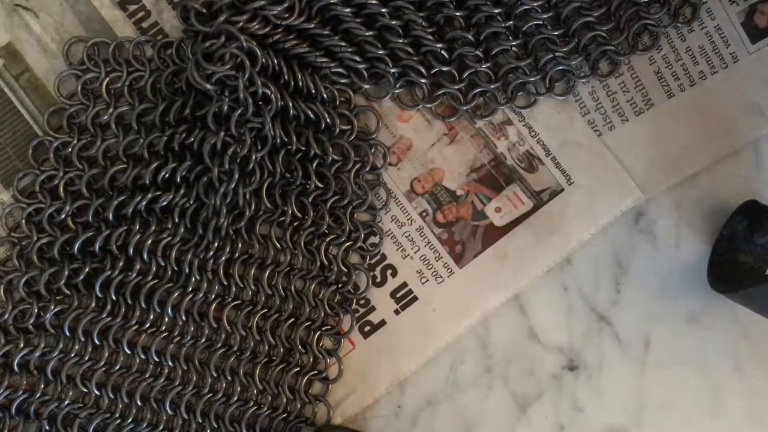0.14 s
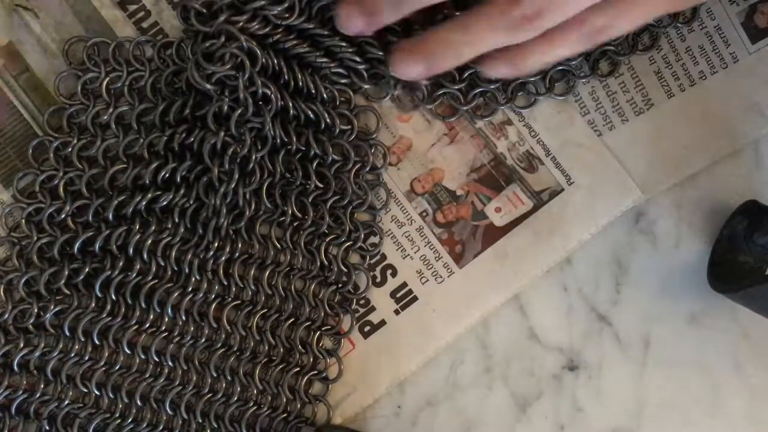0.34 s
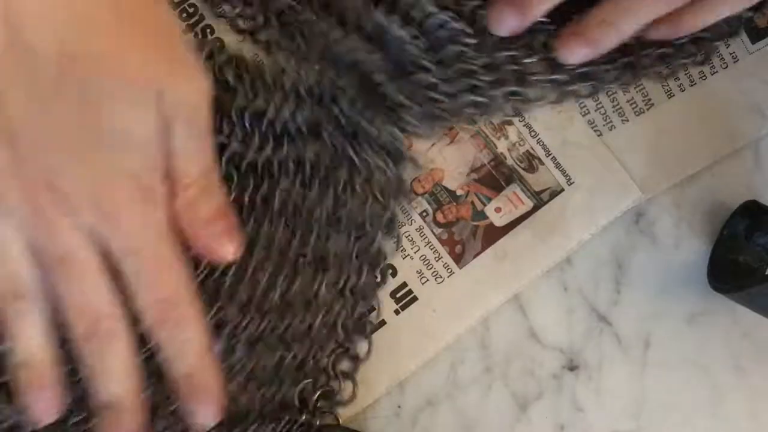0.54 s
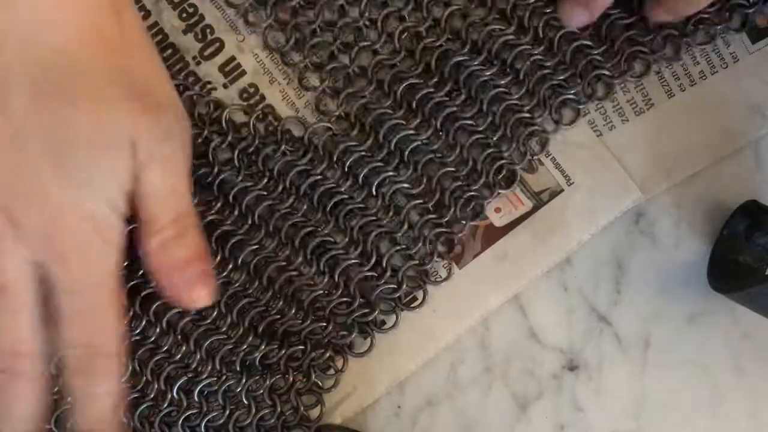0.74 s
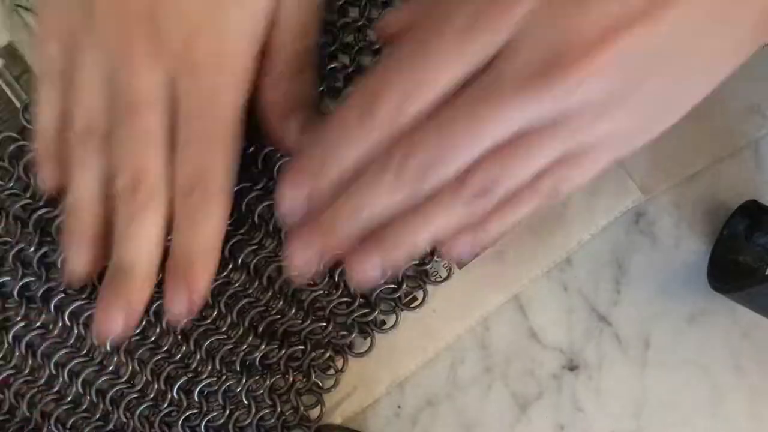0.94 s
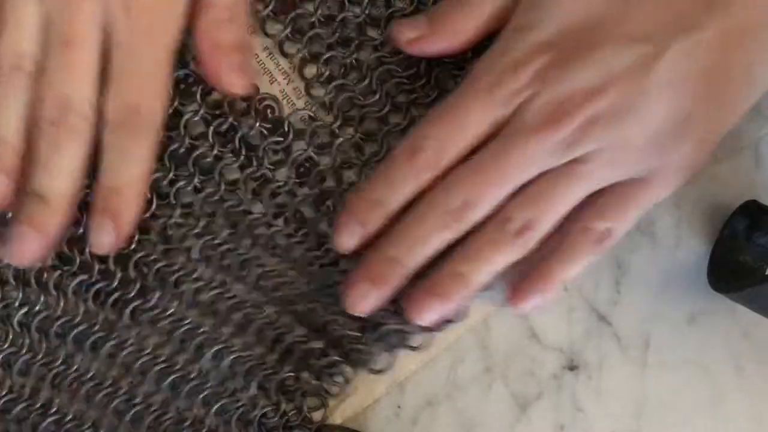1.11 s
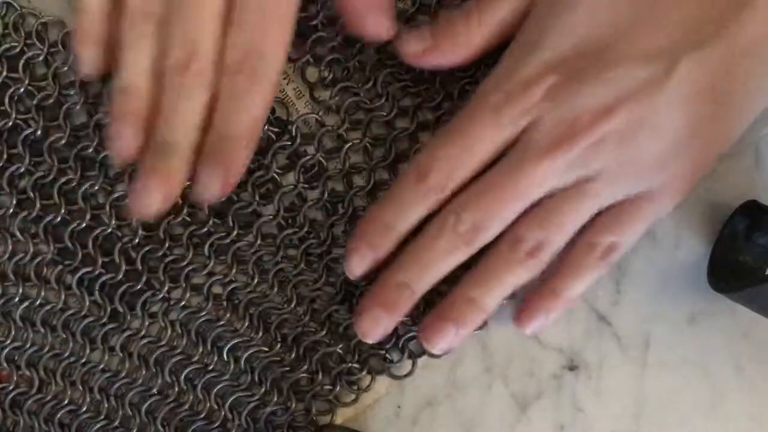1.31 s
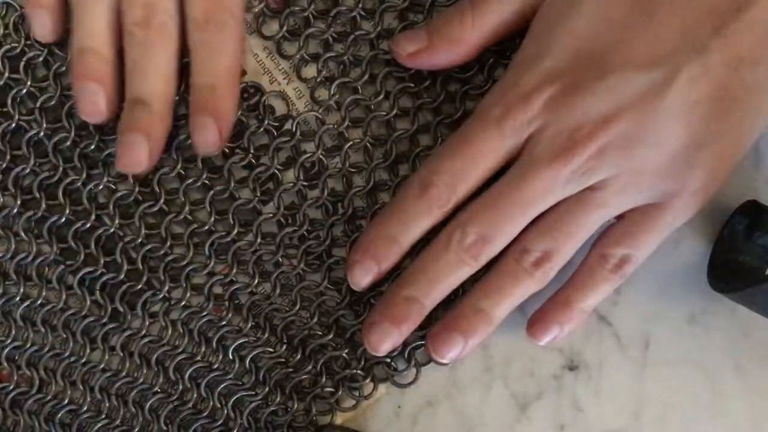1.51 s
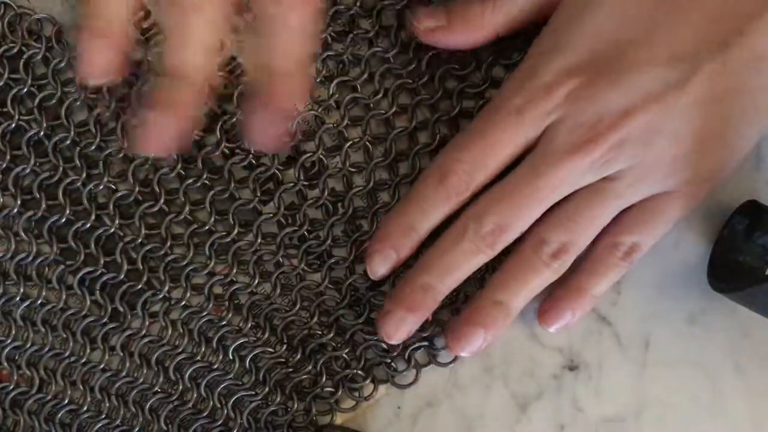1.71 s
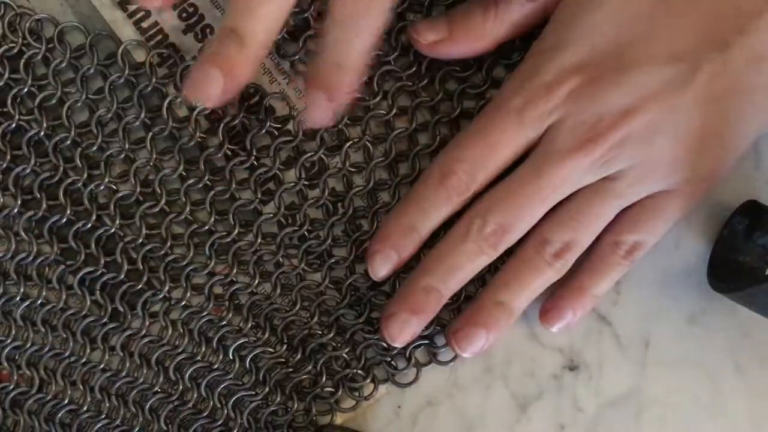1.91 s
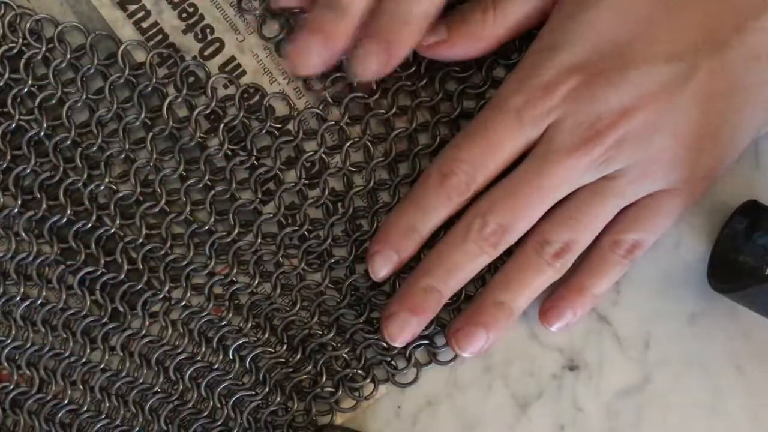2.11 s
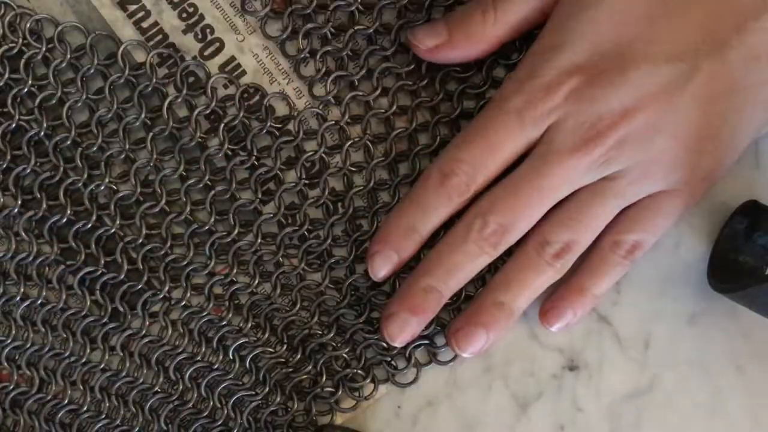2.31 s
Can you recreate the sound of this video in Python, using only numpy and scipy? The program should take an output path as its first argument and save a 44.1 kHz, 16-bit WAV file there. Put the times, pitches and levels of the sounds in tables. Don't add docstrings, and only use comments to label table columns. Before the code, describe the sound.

Close up indoors, steel mesh drops on a paper-covered stone table with a bright crack and dull thud, then hands sweep it flat in jingly hisses, fading to small ticks and a last hard click.

```python
import sys
import numpy as np
from scipy import signal
from scipy.fft import rfft, irfft, next_fast_len
from scipy.io import wavfile
from scipy.ndimage import uniform_filter1d, map_coordinates

SR = 44100
rng = np.random.default_rng(int(sys.argv[2]) if len(sys.argv) > 2 else 0)


def level_to_linear(level):
    exponent = np.asarray(level, float) / 20
    return 10 ** exponent


def unload_wav(signal):
    wavfile.write(
        sys.argv[1],
        SR,
        np.round(np.clip(np.atleast_2d(signal).T, -1, 1) * 32767).astype(np.int16),
    )


N = 103635


def unit(x):
    return x / np.sqrt(np.mean(x ** 2) + 1e-20)


def along(points, hz):
    f, v = np.transpose(points)
    return np.interp(np.log(hz + 1), np.log(f + 1), v)


def filtered(x, response):
    m = next_fast_len(len(x) + 8192)
    return irfft(rfft(x, m) * response(np.fft.rfftfreq(m, 1 / SR)), m)[:len(x)]


def shaped_noise(length, points):
    return unit(filtered(rng.standard_normal(length), lambda f: level_to_linear(along(points, f))))


def bands(peaks, f):
    total = 0
    for k, (c, w, db) in enumerate(peaks):
        total = total + (-1) ** k * level_to_linear(db) * 1j * f * w / (c * c - f * f + 1j * f * w)
    return total


def patchy(x, depth_db):
    z = signal.stft(x, nperseg=256)[2]
    field = uniform_filter1d(rng.standard_normal(z.shape), size=4, axis=0)
    field = uniform_filter1d(field, size=5, axis=1)
    return signal.istft(z * level_to_linear(depth_db * unit(field)), nperseg=256)[1][:N]


def wobble(rate):
    return map_coordinates(rng.standard_normal(400), [np.arange(N) * rate / SR])


def add(track, s, sound):
    part = track[round(s * SR):][:len(sound)]
    part += sound[:len(part)]


def background():
    # frequency in Hz, level in dB rms.
    hum_tones = [(99, -62.5), (200, -75.5)]
    # frequency in Hz, density in dB per Hz.
    air_colour = [(240, -26.5), (400, -6), (1600, -12.5), (3210, -19.5), (6150, -22.5), (16000, -25)]
    # frequency in Hz, density in dB per Hz.
    rumble_colour = [(15, -46), (25, -16.5), (92, -3.5), (124, -14.5), (195, -8), (500, -25.5), (650, -47),
                     (1100, -120)]
    air_db, rumble_db = -70.5, -63
    t = np.arange(N) / SR
    hum = 0
    for hz, db in hum_tones:
        hum = hum + level_to_linear(db + 1.0 + 0.64 * wobble(4)) * np.sin(2 * np.pi * hz * t + 0.45 * wobble(14))
    air = patchy(rng.standard_normal(N), 1.4)
    air = unit(filtered(air, lambda f: level_to_linear(along(air_colour, f)))) * level_to_linear(air_db + 0.88 * wobble(10))
    rumble = shaped_noise(N, rumble_colour) * level_to_linear(rumble_db + 0.5 * wobble(3.9))
    return hum + air + rumble


def click_cluster(events, resonances):
    width_scale, rise_share, tail_rate, crack_gain, detune = 0.81, 0.16, 1.31, 0.32, .015
    lead = 64
    out, plain, t = np.zeros(N), np.zeros(N), np.arange(2048) / SR
    for s, db, length, low_db, high_db in events:
        u = t / length
        envelope = np.clip(u / rise_share, 0, 1) * np.exp(-tail_rate * u)
        burst = np.pad(rng.standard_normal(len(t)) * envelope, (lead, 0))
        body = [(c * np.exp(detune * rng.normal()), w * width_scale, level) for c, w, level in resonances]
        tilt_db = [(300, low_db - 8), (1000, low_db), (3000, low_db), (5000, -2.5), (7000, -3), (10000, high_db)]
        tilt = lambda f: level_to_linear(along(tilt_db, f))
        sound = filtered(burst, lambda f: (bands(body, f) + crack_gain) * tilt(f))
        sound = sound * level_to_linear(db) / np.abs(sound).max()
        crack = filtered(1.0 * (np.arange(len(burst)) == lead), tilt)
        add(out, s - lead / SR, sound)
        add(plain, s - lead / SR, crack * np.linalg.norm(sound) / np.linalg.norm(crack))
    return np.array([out, plain])


def ring_clicks():
    # start in seconds, peak in dB, length in seconds, dB below 3 kHz, dB above 8 kHz. The
    click_events = [
        (.0074, -42, 0.0013, 8, -4),
        (.052, -34.5, 0.0048, -3.5, -2.5),
        (.1755, -39.5, 0.0052, 1, 6),
        (.2356, -19.5, 0.0015, 1, 12.5),
        (.2648, -22.5, 0.0017, -10, -1),
        (1.085, -40, 0.004, 3.5, 2.5),
        (1.415, -47, 0.0082, 6, -4),
        (1.433, -38.5, 0.0087, 14.5, 8.5),
    ]
    more_clicks = [
        (.111, -53, 0.0062, 5, -21),
        (.2725, -33, 0.0011, 30, -10),
        (.428, -34, 0.0025, -0.5, -18.5),
        (.901, -55.5, 0.0023, 0, -11),
        (1.635, -46, 0.0028, -8, 18.5),
        (1.698, -36.5, 0.00051, -12, 5.5),
        (1.809, -45.5, 0.0062, -9.5, -1.5),
        (1.8772, -34, 0.0035, -4, 10),
        (2.0445, -46.5, 0.0065, -10, 4),
    ]
    slam = [
        (.2399, -4.5, 0.0014, -1, -4.5),
    ]
    snap = [
        (2.2342, -23.5, 0.0024, -3, 3),
    ]
    # frequency in Hz, width in Hz, level in dB.
    click_body = [(3560, 450, -6.5), (5086, 400, -3), (6000, 1400, -12), (8540, 450, 0), (10800, 300, -4),
                  (12190, 280, -0.5), (14370, 900, -37)]
    tick_body = [(1220, 620, -13), (2360, 350, 4.5), (3860, 430, -6), (5600, 270, -1), (7940, 5100, -16.5),
                 (13500, 800, -6), (14000, 210, -30.5)]
    slam_body = [(1900, 790, -21), (3350, 220, -6.5), (5420, 570, 6), (9030, 460, 5.5), (11900, 1000, 0)]
    snap_body = [(2300, 160, -8), (5660, 430, 2.5), (6260, 280, -9), (7800, 500, 1), (9700, 370, -24.5),
                 (12500, 250, -2), (13200, 460, -10)]
    return (click_cluster(click_events, click_body) + click_cluster(more_clicks, tick_body)
            + click_cluster(slam, slam_body) + click_cluster(snap, snap_body))


def room(x):
    # frequency in Hz, t60 in seconds.
    decay = [(200, 0.96), (1500, 0.41), (6000, 0.37), (14000, 0.07)]
    lumps_db = 1.5
    hz, t, z = signal.stft(rng.standard_normal(SR // 2), SR, nperseg=256)
    tail = signal.istft(z * level_to_linear(-60 * t / along(decay, hz)[:, None]), SR, nperseg=256)[1]
    tail = tail * level_to_linear(lumps_db * wobble(120)[:len(tail)])
    delayed = np.pad(x, (250, 0))
    return signal.fftconvolve(delayed, tail / np.linalg.norm(tail))[:N]


def specks():
    # start in seconds, peak in dB, length in seconds, centre in Hz.
    contacts = [(0.026, -54, 0.008, 2460), (0.051, -34, 0.0021, 12800), (.0945, -56, 0.0017, 13000),
                (0.099, -55, .003, 7040), (.1510, -42, 0.0027, 9600), (.158, -45, 0.0023, 10000),
                (.2124, -39.5, 0.0069, 7900), (0.215, -45, 0.0096, 1490), (0.234, -38, 0.0012, 10960),
                (0.253, -21, 0.0017, 9000), (0.5733, -39, 0.011, 3600), (0.574, -36.5, 0.0075, 6900),
                (0.654, -48, .006, 4000), (0.8, -63, 0.0056, 2970), (0.989, -60.5, 0.0057, 3630),
                (1.07, -56, 0.0023, 10100), (1.266, -53, 0.0096, 3560), (1.317, -53, .003, 10080),
                (1.549, -58, .003, 14800), (1.571, -52, 0.0045, 8900), (1.689, -47, 0.0039, 12100),
                (1.702, -51, 0.011, 9900), (1.713, -52, .003, 10000), (1.732, -49, 0.0025, 9800),
                (.855, -56, .003, 7940), (1.216, -40, 0.0056, 12500), (1.297, -55, 0.0032, 14000),
                (1.873, -60, 0.0035, 2770), (2.311, -55, 0.0037, 12000), (1.965, -57.5, 0.0037, 13000),
                (2.094, -54.5, 0.0022, 13000), (2.108, -53.5, .004, 11000), (2.244, -50, .002, 12500),
                (2.2483, -43, 0.0017, 13000), (2.252, -57, .002, 8050), (2.274, -52, .002, 2500),
                (0.2707, -32.5, 0.0027, 1500), (.805, -49, .002, 13000)]
    width_oct, rise_s, wider_under_s = 0.32, 0.00039, 0.0032
    out, t = np.zeros(N), np.arange(2048) / SR
    for s, db, length, centre_hz in contacts:
        spread_oct = width_oct * (1 + wider_under_s / length)
        band = lambda f: np.exp(-(np.log2((f + 1) / centre_hz) / spread_oct) ** 2)
        grain = unit(filtered(rng.standard_normal(len(t)), band))
        add(out, s, level_to_linear(db - 11) * grain * (1 - np.exp(-t / rise_s)) * np.exp(-(t / length) ** 2))
    return out


def slide():
    # start, rise, hold and fall t60 in seconds, level in dB.
    strokes = [(0.054, 0.081, 0.1, 0.28, -62), (0.402, .18, 0.14, 0.18, -47),
               (0.71, 0.034, 0.024, 0.036, -53), (0.778, 0.0082, 0.082, 0.14, -63),
               (0.913, 0.016, 0.05, 0.27, -72), (1.057, 0.033, 0.0099, 0.16, -46.5),
               (1.107, 0.022, 0.067, 0.25, -55.5), (1.15, 0.043, 0.055, 0.17, -55),
               (1.301, 0.011, 0.017, 0.16, -68.5), (1.404, 0.0063, 0.01, 0.053, -58),
               (1.431, 0.0011, 0.011, 0.098, -51.5), (1.436, 0.015, 0.034, 0.57, -59.5),
               (1.589, 0.03, 0.031, 0.25, -66), (1.685, 0.015, 0.013, 0.055, -66.5),
               (1.804, 0.0037, 0.01, 0.069, -66.5), (1.916, 0.02, 0.019, 0.12, -72.5),
               (2.041, 0.004, 0.013, 0.12, -64), (2.087, 0.015, 0.012, 0.061, -72),
               (2.27, 0.0055, 0.014, 0.37, -75), (0.217, 0.013, 0.012, 0.5, -48.5)]
    # frequency in Hz, density in dB per Hz.
    rustle = [(290, -51.5), (500, -10.5), (919, -12.5), (2000, -12), (4600, -9.5), (5900, -9), (12700, 0.5),
              (16000, -6)]
    # frequency in Hz, width in Hz, extra level in dB.
    ring_peaks = [(12800, 500, -19), (6400, 300, -2.5)]
    contacts_per_s, size_spread_db, smooth_share, patchy_db = 6000, 4, .6, 1.4
    snaps_per_s, snap_size, swell_power = 90, 6, 1.2
    bright_hz, bright_from_db, bright_grows = 10500, -52, 0.17
    t = np.arange(N) / SR
    power = 0
    for s, rise, hold, fall, db in strokes:
        swell = np.clip((t - s) / rise, 0, 1) ** swell_power
        power = power + (level_to_linear(db - 60 * np.clip(t - s - rise - hold, 0, 9) / fall) * swell) ** 2

    chance, size, sign = rng.random((3, N))
    hits = (chance < contacts_per_s / SR) * level_to_linear(-size_spread_db * np.log(size + 0.015)) * np.sign(sign - .5)
    snaps = snap_size * (chance > 1 - snaps_per_s / SR) * (size - sign)
    mix = smooth_share * rng.standard_normal(N) + (1 - smooth_share) * unit(hits) + snaps

    def colour(f):
        peaks = sum(level_to_linear(db) / (1 + ((f - c) / w) ** 2) for c, w, db in ring_peaks)
        return level_to_linear(along(rustle, f)) * (1 + peaks)

    hiss = unit(filtered(patchy(mix, patchy_db), colour))
    top = filtered(hiss, lambda f: 1 / (1 + (bright_hz / (f + 1)) ** 6))
    growth = (power / level_to_linear(2 * bright_from_db) + 1e-9) ** (bright_grows / 2)
    return (hiss + top * (growth - 1)) * np.sqrt(power) * level_to_linear(.8 * wobble(90))


def thuds():
    # start in seconds, level in dB, upper modes in dB.
    presses = [
        (.241, -37.5, 4.5),
        (.272, -36.5, -12),
        (0.43, -46.5, -2),
        (1.08, -47.5, -22),
        (1.438, -40, -23.5),
        (1.822, -51, -28),
        (2.043, -65, -4.5),
        (2.237, -49.5, -8),
    ]
    # frequency in Hz, level in dB, t60 in seconds, swell in seconds.
    table_modes = [(65.7, 3, 0.41, 0.021), (87.3, 4.5, 0.16, .01), (205.3, -13.5, 0.65, 0.0048),
                   (267.1, 0, 0.2, 0.0025), (345, -6.5, 0.17, 0.0063)]
    # frequency in Hz, level in dB.
    slap_colour = [(40, -43), (100, -11), (180, -9), (300, -1.5), (450, -15), (700, -19.5), (2000, -24),
                   (4000, -42)]
    slap_db, slap_t60_s, slap_rise_s = -5, 0.47, 0.0011
    unsteady_per_s, unsteady_rad, unsteady_db = 30, 1.3, 4
    out, t = np.zeros(N), np.arange(SR) / SR
    for s, db, upper_db in presses:
        slap_level = db + upper_db + slap_db + 2.5 * wobble(45)[:SR] - 60 * t / slap_t60_s
        add(out, s, level_to_linear(slap_level) * (1 - np.exp(-t / slap_rise_s)) * shaped_noise(SR, slap_colour))
        for hz, mode_db, t60, swell in table_modes:
            loose = np.sqrt(hz / 270)
            shake = loose * wobble(unsteady_per_s)[:SR]
            drift = loose * wobble(unsteady_per_s)[:SR]
            level = db + mode_db + upper_db * (hz > 120) + unsteady_db * shake - 60 * t / t60
            tone = np.sin(2 * np.pi * hz * t + unsteady_rad * (drift - drift[0]))
            add(out, s, level_to_linear(level) * (1 - np.exp(-t / swell)) * tone)
    return out


def clinks(touches, modes):
    # frequency in Hz, level in dB.
    clatter_colour = [(300, -7), (800, 11.5), (4000, 2), (6000, -12)]
    favour_oct, ring_rise_s, clatter_rise_s, clatter_t60_s = 1.25, 0.00094, .007, 0.25
    out, t = np.zeros(N), np.arange(SR // 2) / SR
    for s, db, centre_hz, clatter_db in touches:
        favour = lambda hz: np.exp(-(np.log2((hz + 1) / centre_hz) / favour_oct) ** 2)
        ring = 0
        for hz, level, t60 in modes:
            tone = np.sin(2 * np.pi * hz * t + rng.random() * 6)
            ring = ring + favour(hz) * level_to_linear(level - 60 * t / t60) * tone
        colour = lambda f: level_to_linear(along(clatter_colour, f)) * (0.43 + favour(f))
        clatter = unit(filtered(rng.standard_normal(len(t)), colour))
        clatter = clatter * (1 - np.exp(-t / clatter_rise_s)) * level_to_linear(clatter_db - 60 * t / clatter_t60_s)
        add(out, s, level_to_linear(db) * ((1 - np.exp(-t / ring_rise_s)) * ring + clatter))
    return out


def far_crockery():
    # start in seconds, level in dB, favoured frequency in Hz, clatter in dB.
    plate_touches = [
        (.43, -57.5, 900, -18),
        (.95, -75.5, 1000, 14.5),
        (1.095, -74, 1950, 15),
        (1.383, -70.5, 3220, 10.5),
        (1.598, -71.5, 2980, 11.5),
        (1.611, -67, 1384, 9.5),
        (1.88, -69.5, 1320, 4.5),
        (2.07, -75.5, 3120, 5),
    ]
    cup_touches = [
        (.573, -52.5, 3300, -1),
        (.697, -58.5, 1450, -12),
        (1.271, -64, 3300, -1),
    ]
    # frequency in Hz, level in dB, t60 in seconds.
    plate_modes = [(946, 15, 0.03), (1184, -4.5, 0.21), (1716, 1, 0.16), (1950, -24, 0.67), (3300, 5, 0.12)]
    cup_modes = [(960, 5, .15), (1145, 0, .25), (1249, 0, .27), (1916, -2, .2), (2690, 3, .15),
                 (3276, -3, .14), (3494, -6, .1), (4858, 9, .15), (6142, -6, .15), (6780, -1, .15),
                 (7445, -6, .07)]
    return clinks(cup_touches, cup_modes) + clinks(plate_touches, plate_modes)


def ring_ping():
    # start in seconds, level in dB, favoured frequency in Hz, clatter in dB.
    ping_touch = [
        (1.093, -41.5, 12800, -19),
    ]
    # frequency in Hz, level in dB, t60 in seconds.
    ping_modes = [(13000, 11.5, 0.011), (12500, -15, 0.015)]
    return clinks(ping_touch, ping_modes)


def scene():
    # frequency in Hz, level in dB.
    room_colour = [(300, -24), (1000, -11.5), (3000, -5), (4400, -7), (5900, 0), (7200, -5.5), (8700, -3),
                   (12000, -4)]
    click_room_db, slide_room_db = -9.5, -25
    rings, cracks = ring_clicks()
    hiss = slide()
    sent = filtered(level_to_linear(click_room_db) * cracks, lambda f: level_to_linear(along(room_colour, f)))
    sent = sent + level_to_linear(slide_room_db) * hiss
    near = rings + specks() + hiss + thuds() + ring_ping()
    return (background() + near + room(sent) + far_crockery())[None]


def top_cut(x):
    return signal.sosfilt(signal.butter(12, 16810, fs=SR, output="sos"), x)


def record(dry):
    # frequency in Hz, width in Hz, depth from 0 to 1.
    mic_dips = [(4840, 150, 0.45), (10400, 350, .35)]
    bottom_hz, top_hz = 42, 15850

    def microphone(f):
        port = np.prod([1 - d / (1 + ((f - c) / w) ** 2) for c, w, d in mic_dips], axis=0)
        bass_cut = (1j * f / (bottom_hz + 1j * f)) ** 2
        return port * bass_cut * np.clip((top_hz - f) / 100, .005, 1)

    return top_cut(filtered(dry[0], microphone)[None])


dry = scene()
out = record(dry)
unload_wav(out)
```